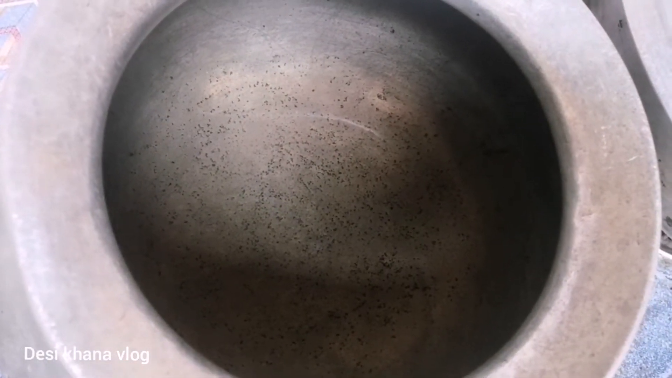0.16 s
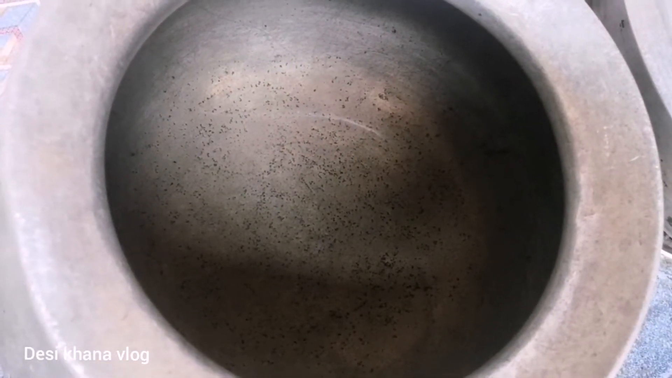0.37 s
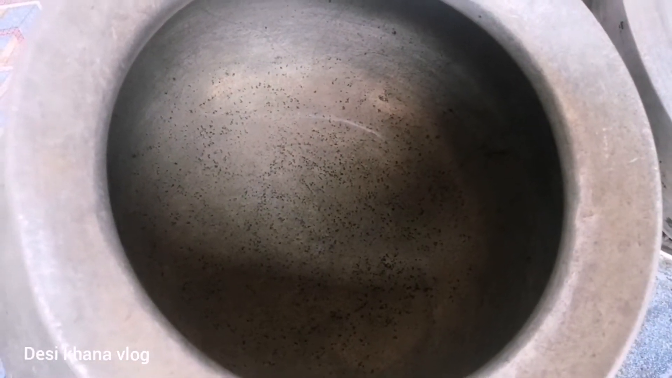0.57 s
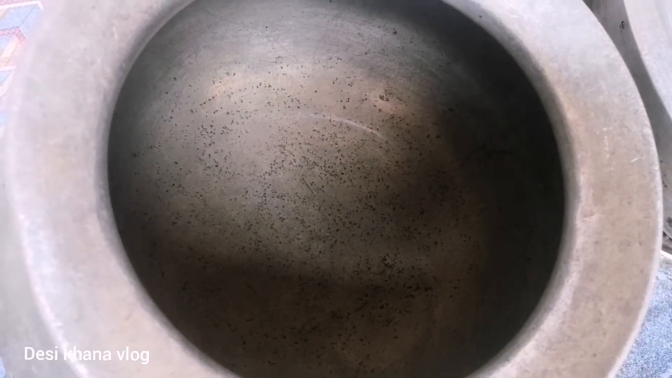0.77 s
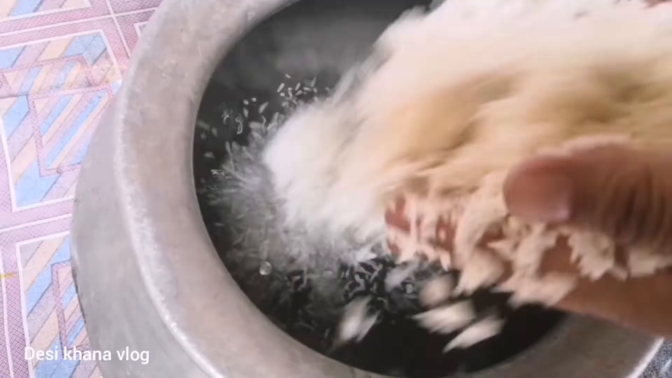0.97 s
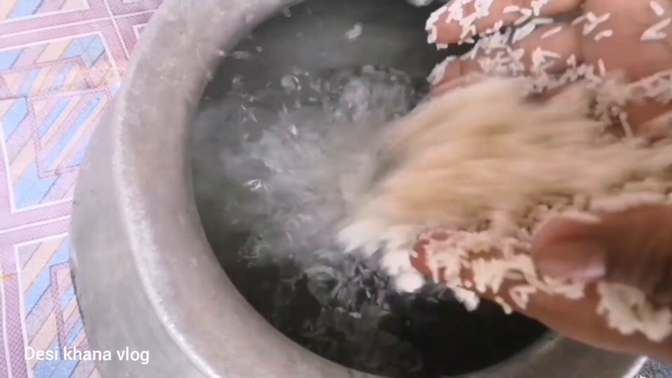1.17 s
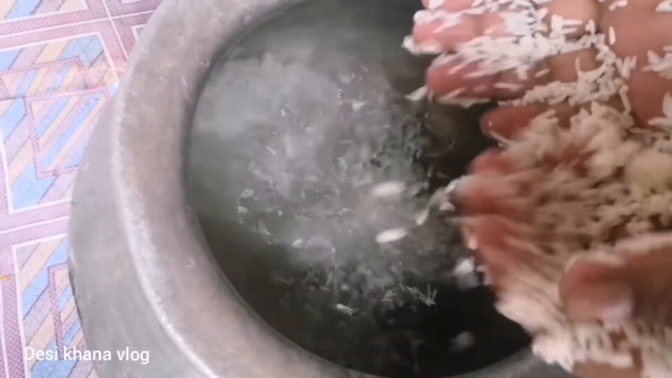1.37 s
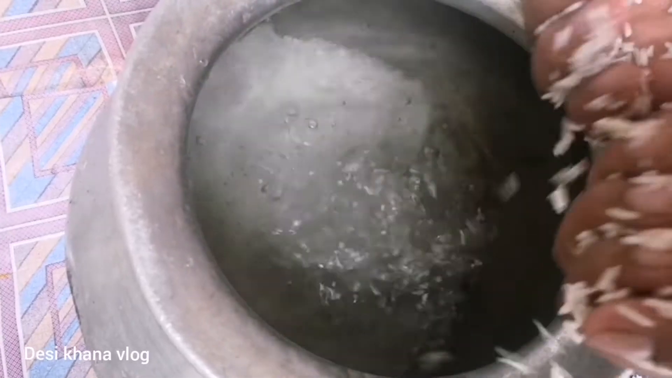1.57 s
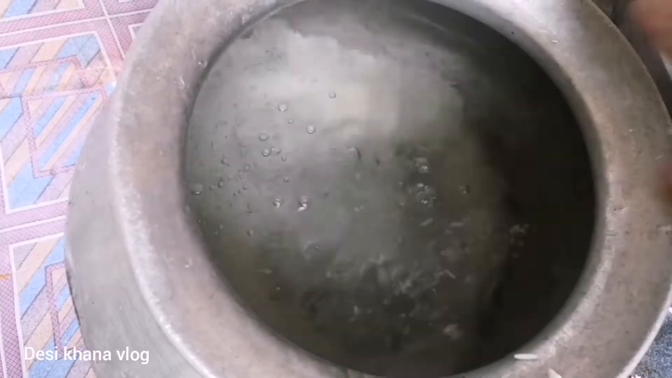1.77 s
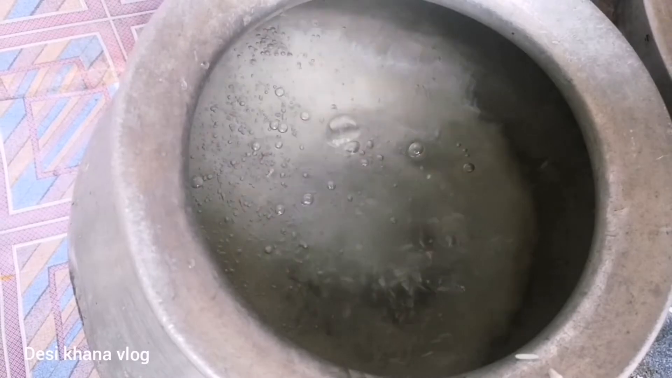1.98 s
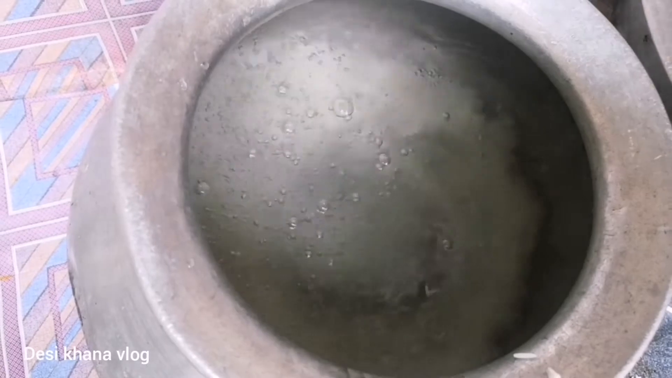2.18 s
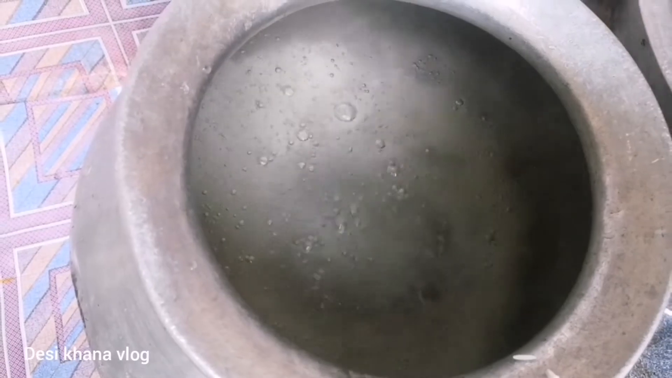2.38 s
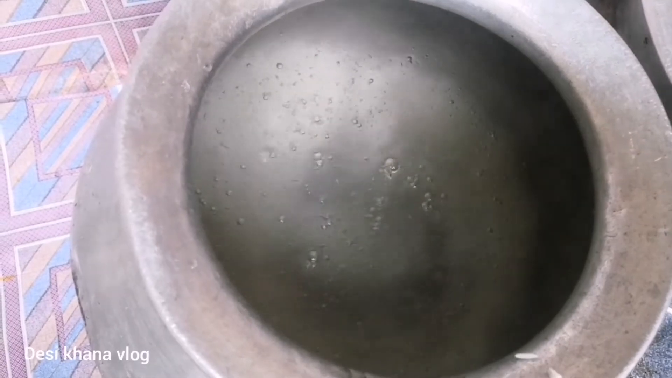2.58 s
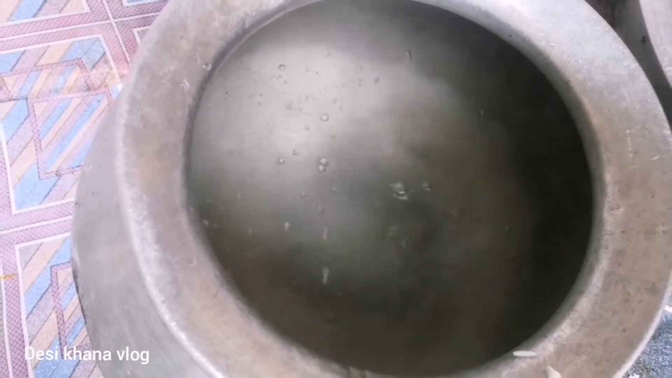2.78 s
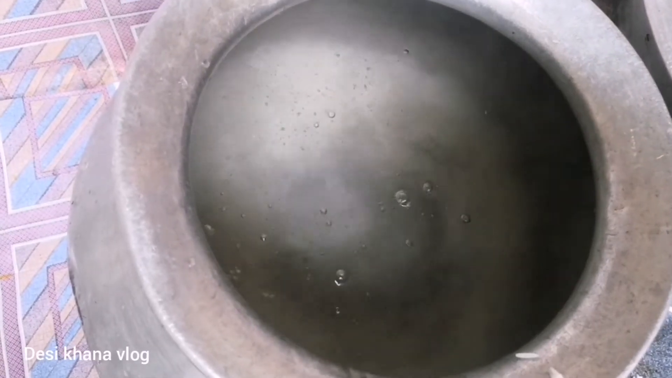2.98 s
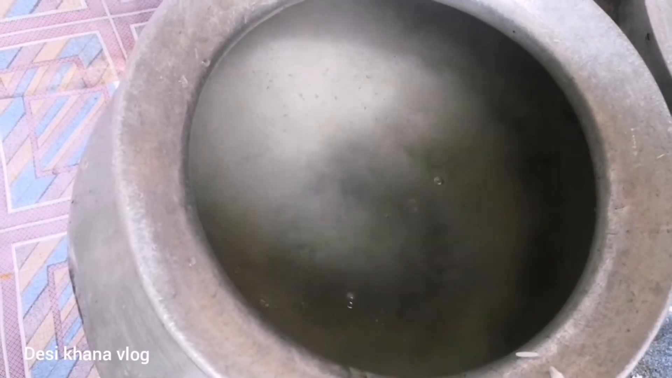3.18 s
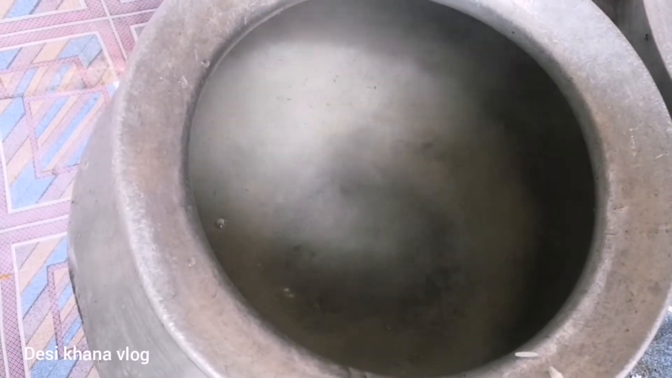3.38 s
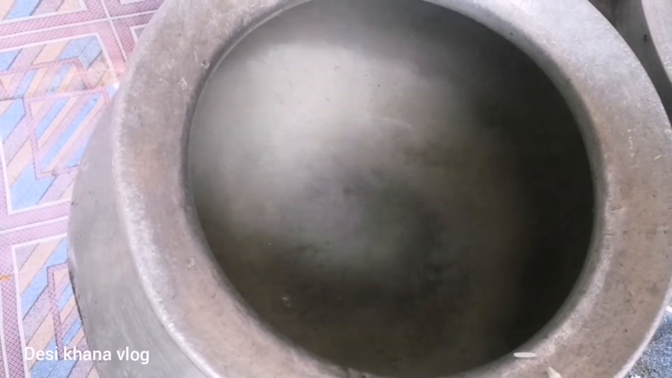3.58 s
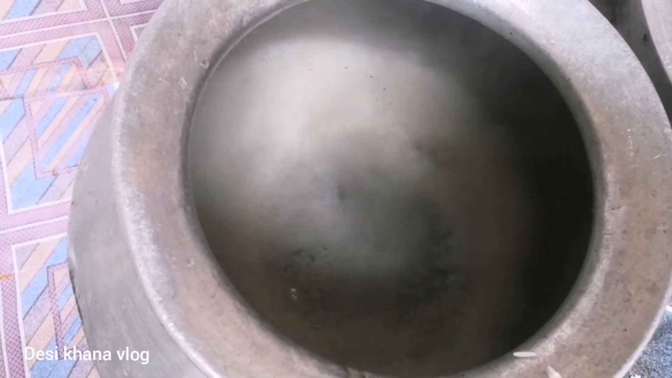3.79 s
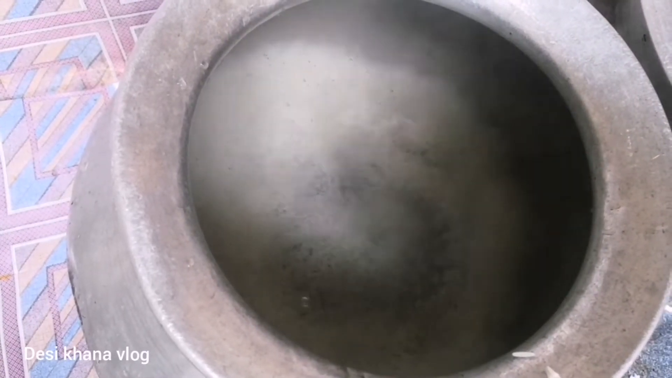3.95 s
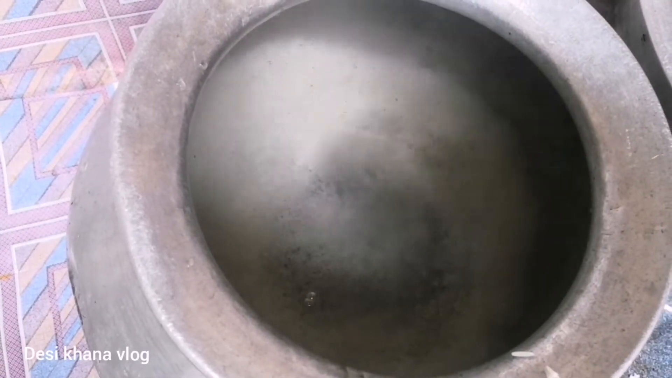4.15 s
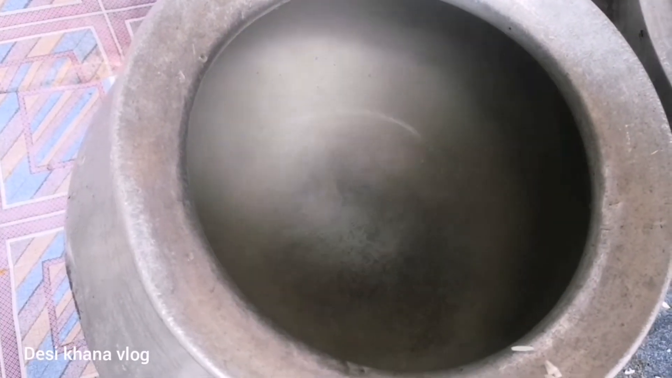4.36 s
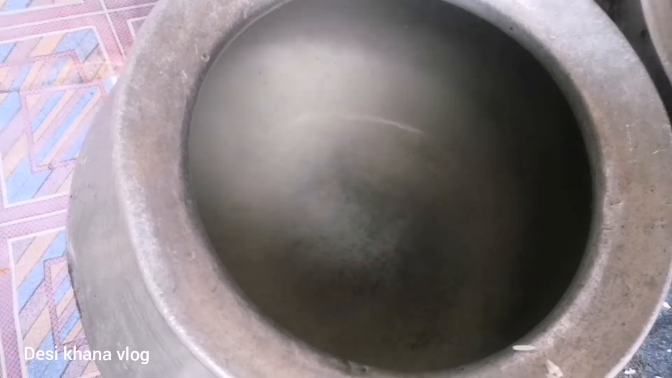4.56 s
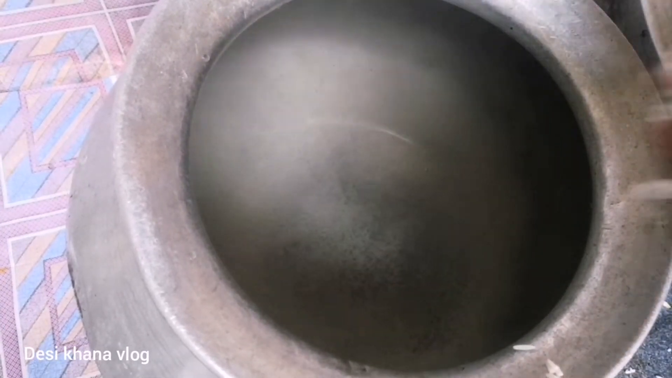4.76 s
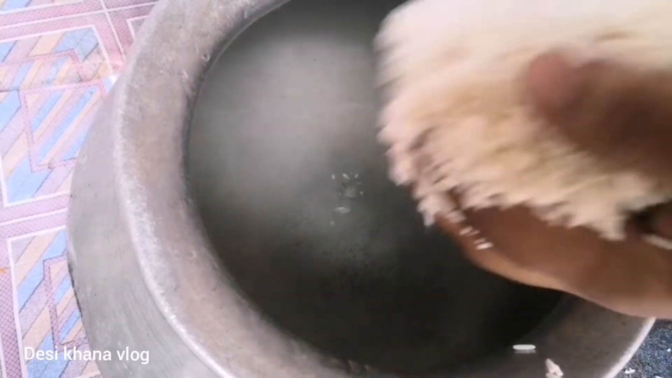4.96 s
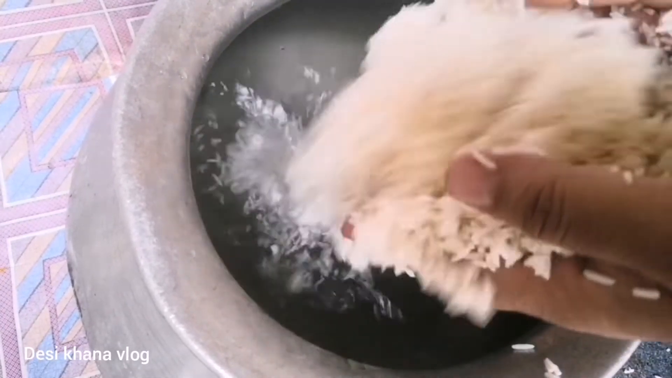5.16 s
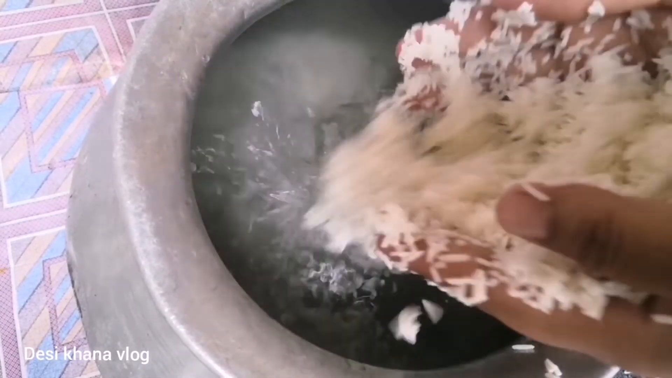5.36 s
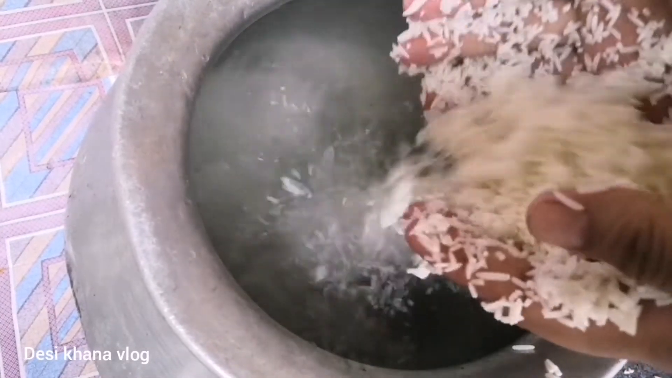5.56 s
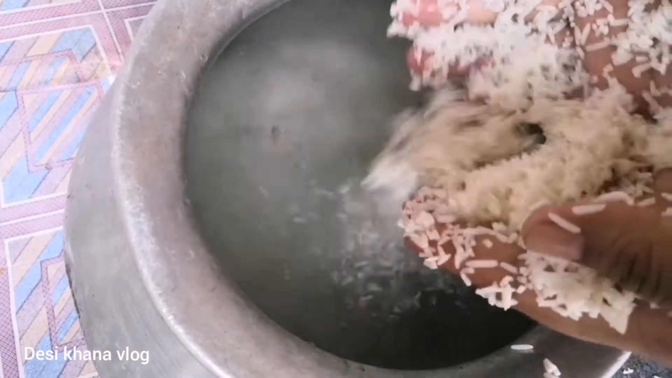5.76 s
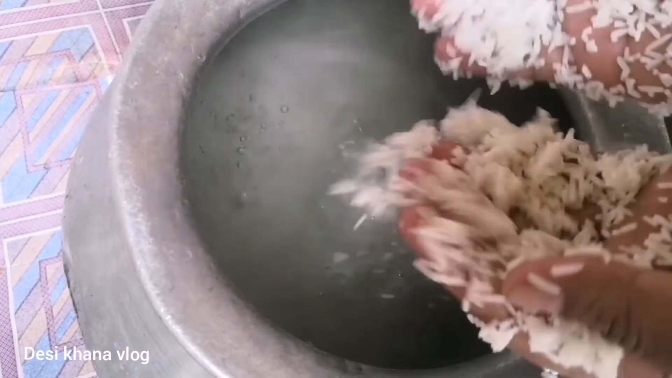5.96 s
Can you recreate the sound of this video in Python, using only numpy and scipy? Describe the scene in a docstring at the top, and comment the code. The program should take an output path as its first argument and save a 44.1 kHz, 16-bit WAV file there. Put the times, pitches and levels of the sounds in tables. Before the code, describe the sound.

A soft, prickly simmering hiss and faint low rumble sit under everything, heard close by in a small hard kitchen. From 0.1 to 0.75 s hands rustle quietly in dry rice, with two tiny ticks; the sound drops out completely from about 0.78 to 0.9 s. At 0.92 s a large handful bursts into the water: loud bright patter and spray, heavy snapping clumps around 1.0 and 1.2 s, hollow gulps and small ringing bubbles, thinning by 1.5 s. Fizz fades until 2.7 s, with stray plops, clustered near 2.0 s. Dry rustling follows at 2.7 s, a tick and bump at 3.05, a faint wavering hollow tone at 3.5, soft scooping, clicks and a thin scrape at 4.2, and a dull thud at 4.5. From 5.0 s a second load slides in by uneven surges, with a hard plunge at 5.17 s, splashing and pattering to the end.

```python
"""First, hands rustle through dry rice beside a pot, over a soft hiss and a faint low rumble.
Then two big double handfuls slide into the simmering water, with stray falls and more scooping between.
Grains are showers of tiny pings and noise; clumps add a snap, spray, ringing bubbles and a hollow gulp.
Hands, ticks, bumps and a scrape are shaped noise; a wavering tone rings softly between the pours.
The pot and a small hard kitchen add echoes, and two unlike microphone ports hear it all close by."""
import sys
import numpy as np
from scipy import signal
from scipy.fft import rfft, irfft, next_fast_len
from scipy.io import wavfile
from scipy.ndimage import map_coordinates

SR = 44100
rng = np.random.default_rng(int(sys.argv[2]) if len(sys.argv) > 2 else 0)


def store_pcm(level_fs):
    """Save levels as 16-bit WAV."""
    pcm = np.round(np.clip(level_fs, -1, 1) * 32767).astype(np.int16)
    wavfile.write(sys.argv[1], SR, np.atleast_2d(pcm).T)


N = 265923  # length of the scene in samples


CHURN_GROWS = 1.09  # dB of low churning per dB of flow
SPOTS = 4  # places on the water that sound at once


def pour(flow_db, tone, rate, spread_db, lumpy_db, churn_db, patter_db, spray_db, dulling_db_per_s):
    """Grains prick the water and free tiny bubbles: patter follows the flow, churning swells faster."""
    sounding = flow_db > -110
    flow_db = flow_db[sounding]
    n = len(flow_db)
    spots = [in_pot(grains(n, rate / SPOTS, cycles=3, spread_db=spread_db), echo_db=-2, t60=.03)
             for _ in range(SPOTS)]
    rain = unit(sum(spots))
    hiss = noise(n, alike=.2)  # bubbles too tiny to hear one by one
    lumps = amp(lumpy_db * wobble(90)[:n])
    loudest = flow_db.max()
    churn = loudest + CHURN_GROWS * (flow_db - loudest) + churn_db
    patter = flow_db + patter_db
    # spray drifts in level: down for positive dulling, up for negative
    spray = flow_db + spray_db - dulling_db_per_s * np.arange(n) / SR
    # lowest Hz, highest Hz, level in dB, hiss in dB against the grains
    bands = [(300, 1550, churn, -17), (1550, 5000, patter, -18), (5000, 16000, spray, -8)]
    out = np.zeros((2, N))
    for lo, hi, db, hiss_db in bands:
        water = (rain + amp(hiss_db) * hiss) * lumps
        band = filtered(water, lambda hz: amp(along(tone, hz)) * (hz >= lo) * (hz < hi))
        out[:, sounding] += amp(db) * unit(band)
    return out


# Rice sliding off the hands, before each band's trim: t/s, level/dB
FIRST_POUR_FLOW = [(0.921, -41.5), (1.0, -29.5), (1.085, -32.5), (1.115, -38.5), (1.16, -28.5),
                   (1.245, -33.5), (1.35, -37.5), (1.405, -45), (1.445, -45), (1.5, -52)]
# Colour of the first load hitting the water: f/Hz, level/dB (per Hz)
FIRST_POUR_TONE = [(250, -36), (350, -13), (510, -7), (780, -13), (900, -14), (1150, -7.5), (1450, -15),
                   (1850, 0), (3000, -3), (3700, 3.5), (5000, -7.5), (7600, -5.5), (11500, -18),
                   (15000, -31)]


def first_pour():
    """The first load of grains hits the water, its spray fading quickly."""
    return pour(curve(FIRST_POUR_FLOW), FIRST_POUR_TONE, rate=1800, spread_db=1.0, lumpy_db=2.9,
                churn_db=-11.0, patter_db=-4.0, spray_db=-1.0, dulling_db_per_s=10.5)


# Rice sliding off the hands, before each band's trim: t/s, level/dB
SECOND_POUR_FLOW = [(5.008, -52), (5.03, -43), (5.09, -43.5), (5.3, -37.5), (5.39, -34.5), (5.435, -49.5),
                    (5.485, -36.5), (5.53, -46.5), (5.6, -39.5), (5.675, -45.5), (5.715, -38),
                    (5.84, -39.5), (5.9, -59), (6.0, -42.5), (6.03, -53)]
# Colour of the second load hitting the water: f/Hz, level/dB (per Hz)
SECOND_POUR_TONE = [(330, -13), (510, -4.5), (750, -4.5), (960, -9), (1150, -5), (1480, -16), (1950, -1),
                    (3300, -6.5), (4500, 1.5), (6400, -3), (7600, 1), (9000, -6), (13500, -17),
                    (15500, -23)]


def second_pour():
    """The second load comes in uneven slides, with grains of more varied size."""
    return pour(curve(SECOND_POUR_FLOW), SECOND_POUR_TONE, rate=1100, spread_db=3.5, lumpy_db=0.9,
                churn_db=-9.5, patter_db=-2.0, spray_db=0.46, dulling_db_per_s=1.1)


# Stray grains after the first pour, before each band's trim: start t/s, length t/s, level/dB
STRAY_SPRINKLES = [(1.59, 0.015, -45.5), (1.715, 0.056, -51), (1.83, 0.05, -52), (1.96, 0.22, -48),
                   (2.365, 0.032, -52.5)]
SPRINKLE_ATTACK_S, SPRINKLE_T60_S = 0.0088, 0.28
# Colour of the fizzing water: f/Hz, level/dB (per Hz)
FIZZING_TONE = [(400, -10), (780, -7), (1300, -0.5), (1900, -4), (2700, -5), (3700, -4), (5000, -1.5),
                (7600, -4.5), (9500, -11), (15000, -21)]
FIZZ_START_S, FIZZ_END_S = 1.48, 2.7
FIZZ_FLOW_DB, FIZZ_FALL_DB_PER_S = -57.5, 5


def afterfall():
    """The sunken rice fizzes on, slowly dying, while stray grains sprinkle in."""
    t = np.arange(N) / SR
    fizz = amp(FIZZ_FLOW_DB - FIZZ_FALL_DB_PER_S * (t - FIZZ_START_S))
    flow = np.hypot(fizz, bursts(STRAY_SPRINKLES, SPRINKLE_ATTACK_S, SPRINKLE_T60_S))
    flow_db = np.where((t > FIZZ_START_S) & (t < FIZZ_END_S), 20 * np.log10(flow), -120)
    return pour(flow_db, FIZZING_TONE, rate=1400, spread_db=0.7, lumpy_db=-2.0,
                churn_db=-9, patter_db=-4.0, spray_db=-5.0, dulling_db_per_s=-3)


# Heavy clumps that push the pot's air:
# t/s, level/dB, starting bubble f/Hz, gulp level/dB and mist level/dB (both against the clump)
HEAVY_CLUMPS = [(0.922, -24.5, 3530, -49, -36), (0.982, -12.5, 2110, -31, -36),
                (0.987, -14.5, 1860, -32, -47), (1.168, -12, 1600, -31, -33),
                (1.236, -16, 3370, -25.5, -36), (1.754, -27.5, 1570, -34, -33),
                (2.377, -25.5, 1730, -33, -55), (5.113, -17, 1940, -45, -34), (5.165, -8.5, 2396, -34, -55),
                (5.172, -17, 1950, -38, -40), (5.293, -18.5, 2060, -29, -29),
                (5.636, -17.5, 3670, -44, -55), (5.703, -27.5, 2040, -46, -23),
                (5.941, -26, 4770, -34, -29)]


def clumps():
    """Heavy clumps plunge in, gulp and spray."""
    out = np.zeros((2, N))
    for s, db, hz, gulp_db, mist_db in HEAVY_CLUMPS:
        sound = splash(hz, gulp_db, bubble_db=-30, froth_db=-55, spray_db=-27,
                       mist_db=mist_db, bubble_t60=0.018)
        add(out, s - LEAD_S, amp(db) * sound)
    return out


# Small pellets that each trap a bubble: t/s, level/dB, starting bubble f/Hz
PELLET_PLOPS = [(1.017, -23, 4510), (1.051, -26, 3770), (1.077, -16.5, 3580), (1.204, -30, 1990),
                (1.221, -21, 1780), (1.256, -20.5, 2445), (1.28, -21, 4140), (1.309, -27, 3600),
                (1.349, -17.5, 3740), (1.39, -27, 4960), (1.423, -26, 2410), (1.431, -21.5, 1885),
                (1.734, -35, 2200), (1.796, -35, 4570), (1.951, -24.5, 2230), (1.959, -20.5, 1890),
                (1.973, -20, 2400), (1.993, -18, 2720), (2.033, -19, 1900), (2.13, -27, 2570),
                (5.228, -20, 4600), (5.255, -28, 2070), (5.379, -21, 1130), (5.587, -29.5, 2220),
                (5.783, -29.5, 3560), (5.809, -27.5, 1870)]


def pellets():
    """Small pellets mostly ring the bubble they trap."""
    out = np.zeros((2, N))
    for s, db, hz in PELLET_PLOPS:
        sound = splash(hz, gulp_db=-52, bubble_db=-22.5, froth_db=-30, spray_db=-25.0,
                       mist_db=-49, bubble_t60=0.013)
        add(out, s - LEAD_S, amp(db) * sound)
    return out


# Colour of the thrown spray: f/Hz, level/dB (per Hz)
SPRAY_TONE = [(800, -98), (1700, -11.5), (4500, 6), (7700, 3), (10000, -9.5), (15000, -65)]
LEAD_S = 0.02  # loose grains land this long before the bulk


def splash(hz, gulp_db, bubble_db, froth_db, spray_db, mist_db, bubble_t60):
    """A lump of rice snaps on the surface, throws spray, traps bubbles and pushes the pot's air."""
    t = np.arange(SR // 10) / SR - LEAD_S
    since = np.maximum(t, 0)

    def wet(x):
        """Keep the middle of the spectrum, about 900 to 7800 Hz."""
        return filtered(x, lambda f: 1 / (1 + (f / 7800) ** 10) / (1 + (900 / (f + 1)) ** 6))

    # loose grains get denser until the bulk lands
    arrival = np.where(t < 0, amp(-15) * fade(np.abs(t), .045), 1)
    white = rng.standard_normal((2, len(t))) * arrival
    scatter = white[0] * (fade(since, 0.0039) + 0.04 * fade(since, 0.0088))
    spray = coloured(scatter, SPRAY_TONE)
    mist = coloured(scatter, [(7500, -18), (10000, 0), (15000, -9)])
    snap = wet(bubbles(t, 1.5 * hz, 0, t60=.0015))
    bubble = wet(bubbles(t, hz, 0, t60=bubble_t60))
    # smaller short-lived bubbles follow, the later the weaker
    pitch, late = rng.random(size=(2, 12, 1))
    small_ones = bubbles(t, 1350 * 2.5 ** pitch, .014 * late ** 2, t60=0.012)
    froth = wet(np.sum(small_ones * amp(-16 * late), axis=0))
    gulp = filtered(white[1] * fade(since, 0.013), hollow)
    parts = [(spray, spray_db), (mist, mist_db), (bubble, bubble_db), (froth, froth_db), (gulp, gulp_db)]
    body = sum(amp(db) * unit(in_pot(sound, echo_db=-2.5, t60=0.033)) for sound, db in parts)
    return body + amp(1.5) * in_pot(snap, echo_db=-5, t60=.025)


def bubbles(t, hz, starts, t60):
    """Bubbles born at the given times ring and rise in pitch as they near the surface."""
    age = np.maximum(t - starts, 0)
    return np.sin(2 * np.pi * hz * age * (1 + 5 * age)) * fade(age, t60)


# Resonances of the air in the pot: f/Hz, width f/Hz, level/dB
POT_AIR = [(512, 41, -0.5), (610, 41, -10), (736, 38, 2.5), (1130, 570, -12)]


def hollow(hz):
    """The air between the water and the pot's mouth resonates, with signs alternating by mode."""
    total = 0
    for k, (centre, width, db) in enumerate(POT_AIR):
        damping = 1j * hz * width
        total = total + (-1) ** k * amp(db) * damping / (centre ** 2 - hz ** 2 + damping)
    return total


# The pot's upper resonances, where a negative lift is a dip: f/Hz, width f/Hz, lift level/dB
POT_WALL = [(1750, 31, 7.5), (1833, 144, 5), (2120, 260, 3), (2340, 110, 2), (2710, 630, 4.5),
            (2970, 57, 5), (3160, 34, 9.5), (3564, 18, 6.5), (4060, 17, -20), (4540, 22, -10.5),
            (7680, 74, 3)]


def wall(hz):
    """Narrow resonances of the pot lift or dip whatever sounds inside it."""
    return amp(sum(db / (1 + (2 * (hz - centre) / width) ** 2) for centre, width, db in POT_WALL))


# How much later the left port hears a spot on the water, in seconds
EARLIEST_LAG_S, LATEST_LAG_S = -0.00025, 0.0006


def in_pot(x, echo_db, t60):
    """A random spot is heard directly and by dense echoes off water and pot, unlike at each side."""
    t = np.arange(SR // 12) / SR
    build_up = 1 - np.exp(-t / 0.00093)
    echoes = unit(noise(len(t), alike=0.094) * fade(t, t60) * build_up) / np.sqrt(len(t))
    echoes *= amp(echo_db)
    lag = round(SR * (EARLIEST_LAG_S + (LATEST_LAG_S - EARLIEST_LAG_S) * rng.random() ** 2))
    # the direct sound reaches each side
    echoes[0, max(lag, 0)] += 1
    echoes[1, max(-lag, 0)] += 1
    return signal.fftconvolve(x[None], echoes, axes=1)[:, :len(x)] / np.hypot(1, amp(echo_db))


def grains(n, rate, cycles, spread_db):
    """Tiny damped pings of all pitches, rate a second, make a flat spectrum at rms 1."""
    count = max(int(min(rate, 9000) * n / SR), 1)
    when, pitch, size, sign = rng.random((count, 4)).T[:, :, None]
    hz = np.geomspace(500, 15000, 512)[(pitch * 512).astype(int)]
    k = np.arange(SR // 150)
    turns = hz * k / SR
    # a few grains are much bigger than the rest
    size = hz * amp(-spread_db * np.log(1 - .985 * size)) * np.sign(sign - .5)
    pings = size * np.sin(2 * np.pi * turns) * np.exp(-turns / cycles)
    at = (when * n).astype(int) + k
    return unit(np.bincount(at.ravel(), pings.ravel(), n)[:n])


# A faint hollow ring: t/s, f/Hz, level/dB, rise t/s, t60 t/s
HOLLOW_RING = [(3.48, 458, -40.5, .045, .48), (3.547, 700, -45, .002, .07), (3.549, 307, -45, .008, .25)]


def ring():
    """Soft hollow tones swell, waver in pitch and die between the pours."""
    out, t = np.zeros((2, N)), np.arange(SR // 2) / SR
    for s, hz, db, rise, t60 in HOLLOW_RING:
        turns = np.cumsum(hz * (1 + .03 * wobble(150)[:len(t)])) / SR
        shape = fade(t, t60) * (1 - np.exp(-t / rise))
        add(out, s, amp(db) * np.sin(2 * np.pi * turns) * shape)
    return out


# Strokes of the hands through dry rice: start t/s, length t/s, level/dB
HAND_STROKES = [(0.115, 0.4, -53), (0.54, 0.22, -61.5), (2.68, 0.17, -50), (3.18, 0.16, -61),
                (3.54, 0.2, -60.5), (3.73, 0.13, -56.5), (4.0, 0.039, -58.5)]
STROKE_ATTACK_S, STROKE_T60_S = 0.033, 0.13
# Colour of the dry rustle: f/Hz, level/dB (per Hz)
RUSTLE_TONE = [(400, -11), (1000, -10), (2300, -5), (3300, -5.5), (4500, -5.5), (5700, -1.5), (7800, -8),
               (9500, -16.5), (15000, -37)]


def digging():
    """Dry grains rub and click as the hands gather the next load."""
    clicks = in_pot(grains(N, rate=1800, cycles=0.41, spread_db=5.5), echo_db=2, t60=0.017)
    rustle = coloured(clicks + amp(-0.5) * noise(N, alike=0.042), RUSTLE_TONE)
    return bursts(HAND_STROKES, STROKE_ATTACK_S, STROKE_T60_S) * amp(1.4 * wobble(14)) * rustle


# Dry ticks beside the pot: t/s, level/dB, centre f/Hz, t60 t/s
DRY_TICKS = [(0.652, -47, 4000, 0.053), (0.755, -46.5, 5800, 0.037), (3.047, -37.5, 5060, 0.069),
             (4.187, -49, 5100, 0.045), (4.213, -33.5, 2080, 0.018), (4.254, -36.5, 4770, 0.029),
             (4.492, -43, 6000, 0.025)]


def ticks():
    """Short dry knocks of gritty noise, each around its own pitch."""
    out = np.zeros((2, N))
    for s, db, hz, t60 in DRY_TICKS:
        add(out, s, amp(db) * struck(hz, 0.74, t60))
    return out


# Dull bumps beside the pot: t/s, level/dB, centre f/Hz, clink level/dB (over the bump)
DULL_BUMPS = [(3.06, -44, 3960, 0.5), (4.48, -37, 1440, -33)]
# What a bump sets ringing: f/Hz, width in octaves
CLINK_MODES = [(2240, 0.19), (3760, 0.031)]


def bumps():
    """Broad thuds of gritty noise, each with a clink of narrower bands."""
    out = np.zeros((2, N))
    for s, db, hz, clink_db in DULL_BUMPS:
        clink = sum(struck(mode_hz, octaves, t60=0.24) for mode_hz, octaves in CLINK_MODES)
        add(out, s, amp(db) * (struck(hz, 2.5, t60=0.31) + amp(clink_db) * clink))
    return out


# One thin scrape: start t/s, length t/s, level/dB
THIN_SCRAPE = [(4.187, 0.062, -46.5)]


def scrape():
    """One short scrape of gritty noise in a narrow band."""
    return bursts(THIN_SCRAPE, attack_s=0.002, t60=0.032) * grit(N, 5040, 0.35)


def struck(hz, octaves, t60):
    """A knock starts almost at once and dies away as gritty noise."""
    t = np.arange(SR // 3) / SR
    return grit(len(t), hz, octaves) * fade(t, t60) * (1 - np.exp(-t / 0.00023))


def grit(n, hz, octaves):
    """Noise of randomly jumping strength sounds gritty; here in one band, at rms 1."""
    rough = noise(n, alike=0.017) * amp(11.3 * rng.standard_normal(n))

    def band(f):
        """A bell around hz, with less treble above about 8500 Hz."""
        bell = np.exp(-.5 * (np.log2((f + 1) / hz) / octaves) ** 2)
        return bell / np.sqrt(1 + (f / 8500) ** 8)

    return unit(filtered(rough, band))


# How long echoes last at each pitch: f/Hz, t60 t/s
KITCHEN_ECHO = [(200, 0.39), (2000, 0.17), (10000, 0.1)]


def kitchen(x):
    """A small hard room; the treble dies first, and the moving hands keep changing the echoes."""
    out, hop = np.zeros((2, N)), SR // 20
    for start in range(0, N, hop):
        # each short slice gets a fresh tail of decaying noise
        hz, t, z = signal.stft(rng.standard_normal((2, SR // 3)), SR, nperseg=256)
        decay = amp(-60 * t / along(KITCHEN_ECHO, hz)[:, None])
        tail = signal.istft(z * decay, SR, nperseg=256)[1]
        tail = tail / np.linalg.norm(tail[0])
        add(out, start / SR, signal.fftconvolve(x[:, start:start + hop], tail, axes=1))
    return out


# Colour of the simmering: f/Hz, level/dB (per Hz)
SIMMER_TONE = [(130, -1), (260, -5), (350, -2.5), (500, -6.5), (800, -7), (1200, -9.5), (1900, -8.5),
               (2800, -14.5), (3600, -18.5), (5500, -18.5), (7600, -18), (9500, -25.5), (15000, -33.5)]
SIMMER_START_DB, SIMMER_RISE_DB_PER_S = -59.5, 0.7756  # the hiss grows as the pot heats


def simmer():
    """Soft prickly hiss from all over the heated pot, mixing noise with sparse tiny pings."""
    level_db = SIMMER_START_DB + SIMMER_RISE_DB_PER_S * np.arange(N) / SR + wobble(11)
    spots = [in_pot(grains(N, rate=200, cycles=0.85, spread_db=1.5), echo_db=5.5, t60=0.082)
             for _ in range(SPOTS)]
    prickle = unit(sum(spots))
    hiss = amp(level_db) * coloured(noise(N, alike=0.078) + amp(-6) * prickle, SIMMER_TONE)
    return filtered(hiss, lambda hz: hz ** 2 / (hz ** 2 + 170 ** 2))


# Colour of the low rumble: f/Hz, level/dB (per Hz)
RUMBLE_TONE = [(15, -25), (25, 1.5), (43, 7), (87, 0), (107, -2.5), (140, 4), (173, -3.5), (251, -1),
               (350, -15.5), (460, -39), (770, -120)]
# Swells as the hands move and each load goes in: start t/s, length t/s, level/dB (before the bass cut)
RUMBLE_SWELLS = [(0.93, 0.39, -47), (1.95, 0.14, -49), (4.19, 0.055, -57), (5.0, 0.44, -51.5),
                 (5.5, 0.33, -49.5)]
SWELL_ATTACK_S, SWELL_T60_S = 0.054, 1
SWELL_LOW_HZ = 53.3  # the swells have less deep bass than the steady rumble


def rumble():
    """Low noise, alike on both sides, rumbles steadily and swells now and then."""
    steady = amp(-60) * coloured(noise(N, alike=1.0), RUMBLE_TONE)
    swell = filtered(coloured(noise(N, alike=1.0), RUMBLE_TONE),
                     lambda hz: hz ** 2 / (hz ** 2 + SWELL_LOW_HZ ** 2))
    return steady + bursts(RUMBLE_SWELLS, SWELL_ATTACK_S, SWELL_T60_S) * swell


def amp(db):
    """Decibels to gain."""
    return 10 ** (np.asarray(db) / 20)


def unit(x):
    """Scale to rms 1."""
    return x / np.sqrt(np.mean(x ** 2) + 1e-20)


def along(points, hz):
    """(Hz, value) points joined on a log axis."""
    f, v = np.transpose(points)
    return np.interp(np.log(hz + 1), np.log(f + 1), v)


def wobble(rate):
    """A smooth random curve, rate knots a second."""
    knots = rng.standard_normal(int(N * rate / SR) + 4)
    return map_coordinates(knots, [np.arange(N) * rate / SR])


def filtered(x, response):
    """Change the strength of each pitch in x by a response of frequency."""
    n = x.shape[-1]
    m = next_fast_len(n + 4096)  # spare room for the filter's tail
    return irfft(rfft(x, m) * response(np.fft.rfftfreq(m, 1 / SR)), m)[..., :n]


def coloured(x, spectrum):
    """x shaped by (Hz, dB) points, at rms 1."""
    return unit(filtered(x, lambda hz: amp(along(spectrum, hz))))


def fade(t, t60):
    """Exponential decay, down 60 dB after t60 seconds."""
    return np.exp(-np.log(1000) * t / max(t60, 1e-4))


def noise(n, alike):
    """Stereo white noise with a share common to both sides."""
    a, b, common = rng.standard_normal((3, n))
    alike = np.clip(alike, 0, 1)
    return np.sqrt(1 - alike) * np.array([a, b]) + np.sqrt(alike) * common


def curve(rows):
    """An (s, dB) curve as one dB value per sample, silent outside its span."""
    s, db = np.transpose(rows)
    return np.interp(np.arange(N) / SR, s, db, -120, -120)


def bursts(rows, attack_s, t60):
    """Gain of (start, length, dB) gestures: each rises, holds and dies away."""
    t = np.arange(N) / SR
    gain = np.zeros(N)
    for s, length, db in rows:
        rise = np.clip((t - s) / attack_s, 0, 1)
        gain += amp(db) * rise * fade(np.maximum(t - s - length, 0), t60)
    return gain


def add(track, s, sound):
    """Mix a sound into the track at time s."""
    part = track[:, round(s * SR):][:, :sound.shape[-1]]
    part += sound[..., :part.shape[1]]


# Colour difference of the two ports: f/Hz, left minus right level/dB
PORT_DIFFERENCE = [(150, 0), (450, -4.5), (700, -3), (1200, -2.5), (1900, -7.5), (3000, -3), (4500, -4.5),
                   (6500, -5.5), (7700, -11.5), (8800, 3.5), (10500, 4.5), (15000, 2)]


def scene():
    """Everything in and around the pot, heard by two ports of unlike colour."""
    water = first_pour() + afterfall() + second_pour() + clumps() + pellets()
    near = filtered(water, wall) + ring() + digging() + ticks() + bumps() + scrape()
    air = near + amp(-7.5) * kitchen(near) + simmer() + rumble()
    # half of the difference goes to each side
    return filtered(air, lambda hz: amp(np.outer([.5, -.5], along(PORT_DIFFERENCE, hz))))


MUTE_START_S, MUTE_END_S = 0.775, 0.895
TOP_HZ = 15500


def record(dry):
    """The sound drops out briefly before the first pour; nothing passes above the band limit."""
    t = np.arange(N) / SR
    heard = (t < MUTE_START_S) | (t > MUTE_END_S)
    return filtered(dry * heard, lambda hz: hz < TOP_HZ)


dry = scene()
out = record(dry)
store_pcm(out)
```